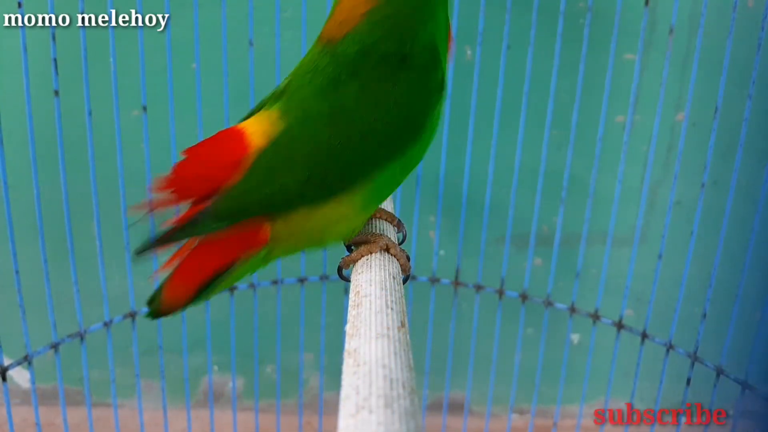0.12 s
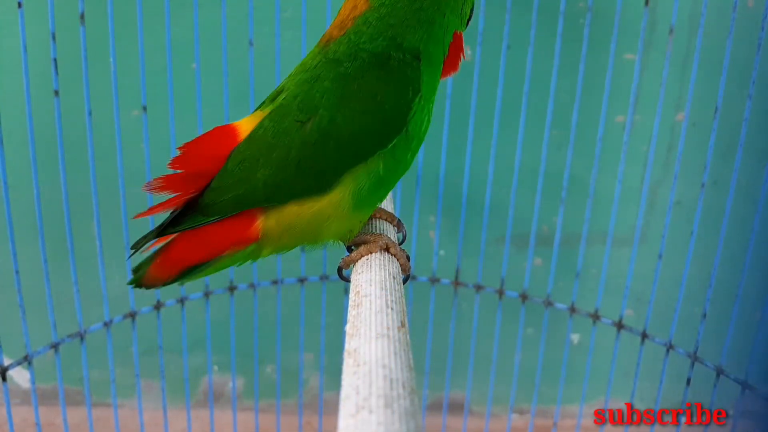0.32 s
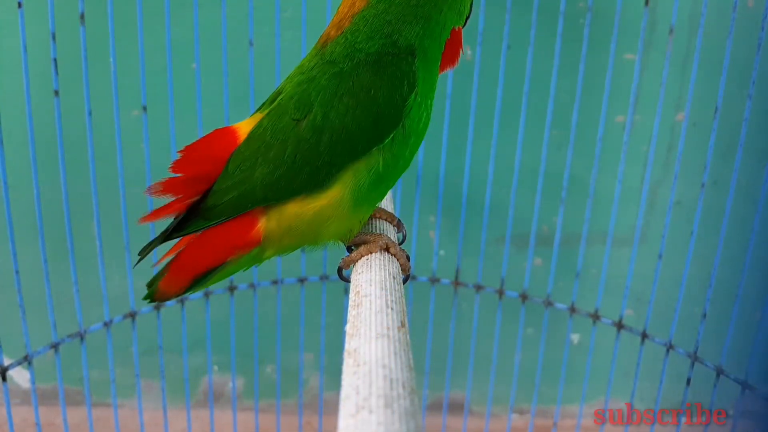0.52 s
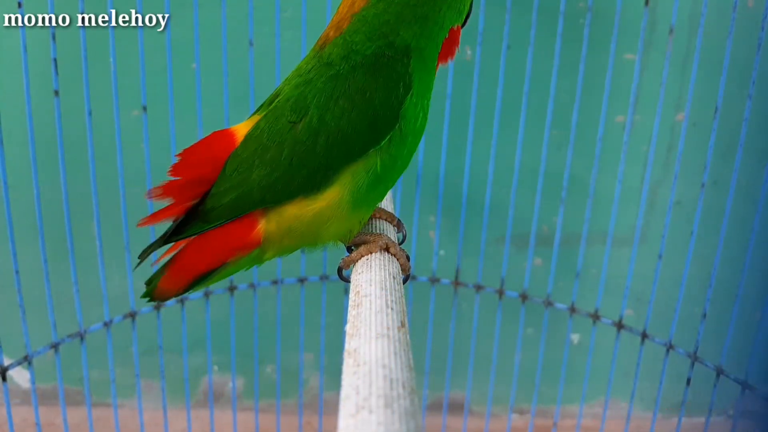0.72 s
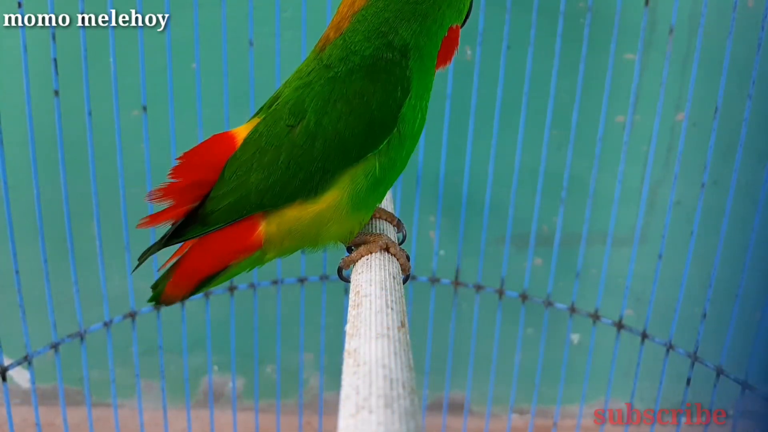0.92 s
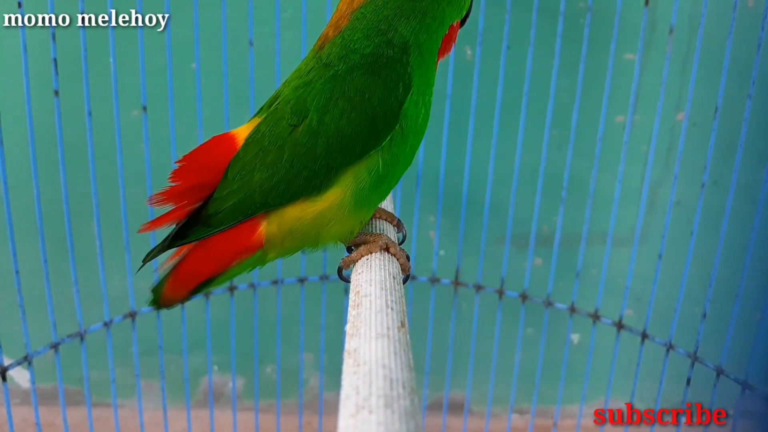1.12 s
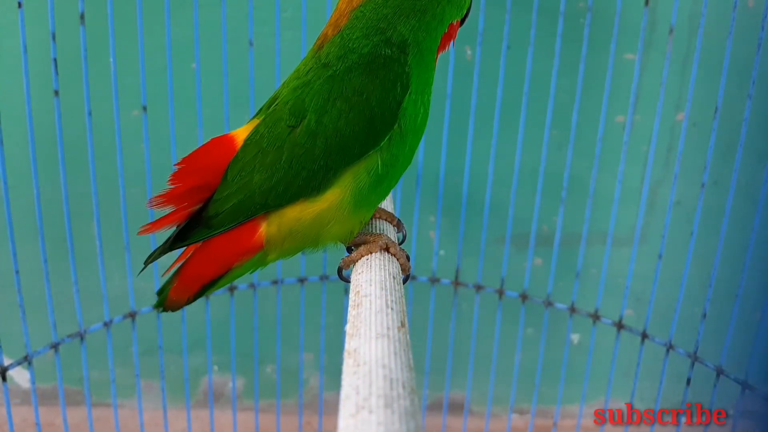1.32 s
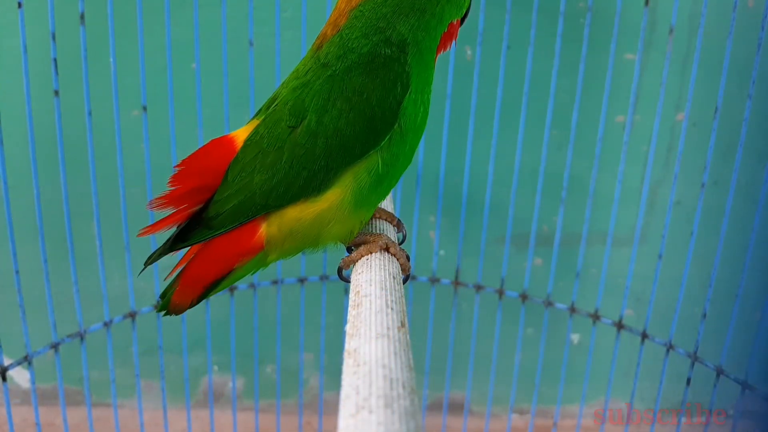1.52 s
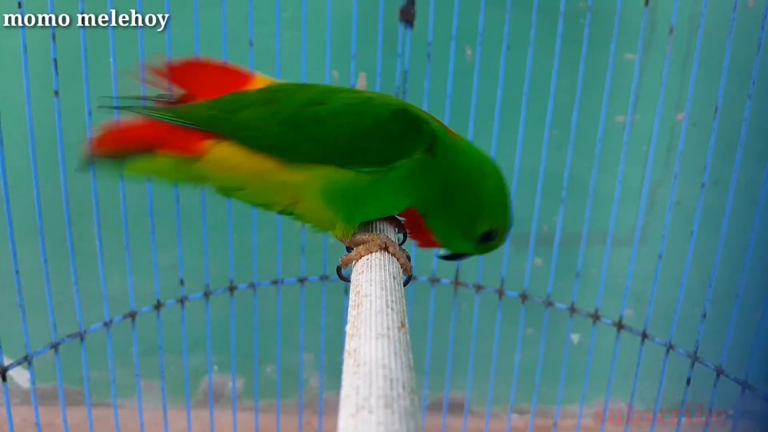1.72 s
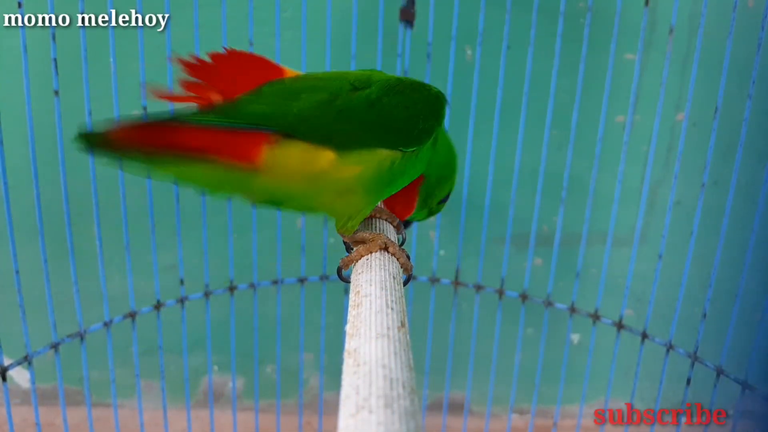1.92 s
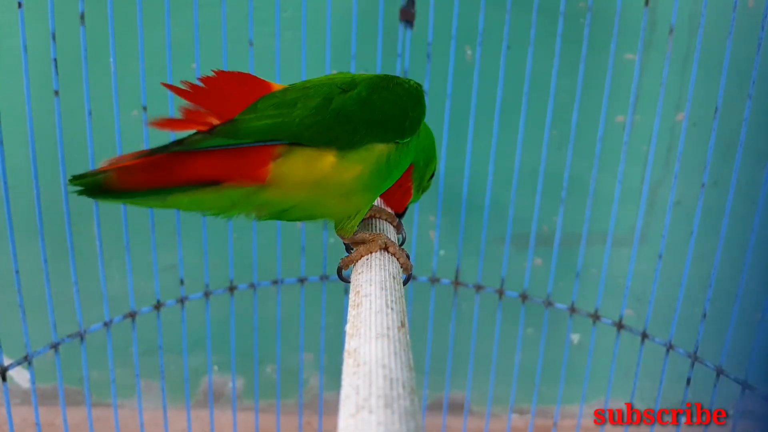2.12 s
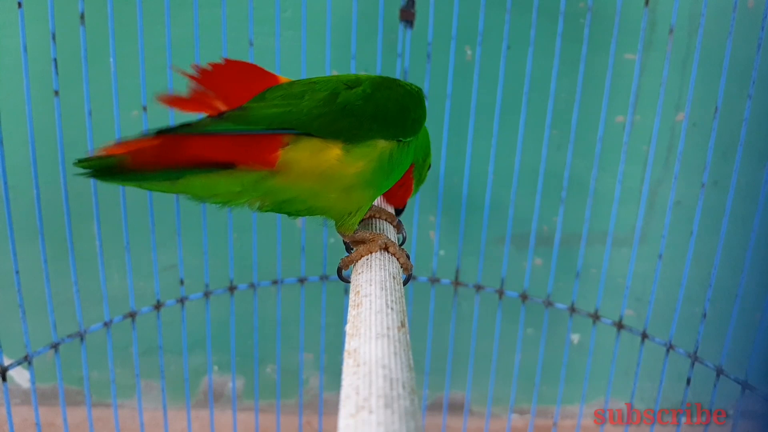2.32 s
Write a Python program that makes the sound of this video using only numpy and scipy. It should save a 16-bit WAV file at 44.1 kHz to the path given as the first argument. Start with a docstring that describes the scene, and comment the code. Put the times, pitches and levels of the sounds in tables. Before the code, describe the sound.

A small parrot calls close by in a hard, live room. A piercing, wavering whistle around 7 kHz starts at 0.2 s, with dull low puffs; quick warbles at 0.6 and 0.8 s end in squeaks. A much quieter chirp comes at 1.2 s, a faint raspy one at 1.7. Feathers rustle from 1.9 s with dry claw ticks, and thin rising peeps sound at 2.1 and 2.3 s over faint room rumble.

```python
"""Small parrot chirping in a cage

Close by in a hard-walled room it gives a long shrill whistle, two like warbles that end in squeaks,
a short chirp, a soft one and thin rising peeps: wobbling sine tones with overtones, air and rasp.
Dull puffs of low noise come with the loud notes. It swings round on its perch with a rustle of
feathers (grainy noise) and a few claw ticks (very short noise bursts), over a low room rumble.
"""
import sys
import numpy as np
from scipy import signal
from scipy.fft import rfft, irfft
from scipy.io import wavfile
from scipy.ndimage import uniform_filter1d, minimum_filter1d

SR = 44100
rng = np.random.default_rng(int(sys.argv[2]) if len(sys.argv) > 2 else 0)


def output_pcm(signal):
    """Save a mono or channel-first signal as 16-bit PCM at the path in sys.argv[1].

    Samples are clipped to [-1, 1] before scaling.
    """
    pcm = np.clip(np.atleast_2d(signal).T, -1, 1) * 32767
    wavfile.write(sys.argv[1], SR, np.round(pcm).astype(np.int16))


N = 110250
TIME = np.arange(N) / SR

# How the bird's voice organ moves in each kind of call, before the call list stretches, transposes
# and levels it: (time from the start of the call [s], pitch [Hz], level [dB], roughness [0-1])
WHISTLE = [(0, 7200, -28, .1), (.005, 7040, -17, .05), (.013, 6980, -11, .1), (.017, 5750, -18, .5),
           (.028, 7700, -21, 1), (.036, 7270, -11, .8), (.084, 7205, -7.5, .35), (.1, 7210, -12, .9),
           (.158, 7170, -8, .5), (.164, 6900, -17, .7), (.172, 5750, -21, .9), (.181, 4900, -20, .6),
           (.191, 6850, -19, .5), (.21, 7150, -13, .25), (.235, 7010, -6, .15), (.249, 7080, -10, .2),
           (.255, 7200, -28, .6)]
# the same columns, for a warble
WARBLE = [(0, 2900, -35, .6), (.006, 3160, -41, 1), (.014, 5750, -33, .7), (.029, 6370, -27, .6),
          (.052, 6750, -18.5, .17), (.064, 7170, -14.5, .12), (.071, 7230, -13, .12),
          (.082, 6950, -12.5, .1), (.093, 6280, -24, .43), (.104, 5300, -43, 1), (.111, 4750, -32, .8),
          (.115, 5200, -40, 1), (.123, 6450, -26, .8), (.131, 5900, -24, .5), (.138, 5000, -24, .4),
          (.143, 6200, -28, .5), (.147, 6480, -15, .15), (.152, 6800, -15, .15), (.156, 5500, -21, .3),
          (.159, 6700, -20, .3)]
# the same columns, for the high squeak that ends a warble
SQUEAK = [(0, 7600, -20, .3), (.003, 7950, -10, .1), (.008, 8010, -12, .15), (.014, 7930, -23, .4)]
# the same columns, for a short chirp
CHIRP = [(0, 6780, -64, 0.98), (.003, 6266, -39.5, 0.1), (0.011, 6584, -22.5, 0.056),
         (0.023, 6810, -36, 0.38), (0.037, 7200, -34.5, 1), (0.051, 6600, -41, .8), (.059, 4760, -46, 0.53),
         (0.073, 4200, -49, 1)]
# the same columns, for a soft chirp
SOFT_CHIRP = [(0, 2710, -60, 0.64), (0.025, 3966, -49.5, 0.85), (0.04, 6730, -36.5, 0.68),
              (.081, 6000, -48, 0.86), (0.104, 5450, -59.5, 0.96)]
# the same columns, for a thin rising peep
PEEP = [(0, 6420, -46, .45), (.028, 6350, -38, .4), (.062, 6630, -35, .5), (.115, 6810, -37, .25),
        (.14, 6850, -35, .1), (.158, 6860, -44, .2)]
# the same columns, for the last peep
LATE_PEEP = [(0, 6480, -38, .6), (.04, 6370, -37, .3), (.056, 6420, -27, .05), (.083, 6630, -32, .3),
             (.104, 6770, -38, .55), (.126, 6820, -32, .15), (.14, 6830, -46, .2), (.175, 6820, -40, .1)]


def from_db(db):
    """Turn decibels into a gain: every 20 dB is a factor of ten."""
    return 10 ** (np.asarray(db) / 20)


def rms_one(x):
    """Scale a sound so that its average strength (rms) is 1."""
    return x / np.sqrt(np.mean(x ** 2) + 1e-20)


def in_time(points):
    """Draw a curve through (time, value) points and read it at every sample."""
    times, values = np.transpose(points)
    return np.interp(TIME, times, values)


def at_hz(points, hz):
    """Gain of a (frequency, dB) spectrum at the given frequencies."""
    point_hz, point_db = np.transpose(points)
    return from_db(np.interp(np.log(hz + 1), np.log(point_hz), point_db))


def pan(db):
    """Left and right gains that differ by db (plus is left) but keep the total power."""
    gains = from_db(np.array([[.5], [-.5]]) * db)
    return gains / np.sqrt(np.mean(gains ** 2, axis=0))


def drift(top_hz):
    """A random wander with rms 1 that holds little movement faster than top_hz."""
    lowpass = signal.butter(3, top_hz, fs=SR, output="sos")
    return rms_one(signal.sosfilt(lowpass, rng.standard_normal(N)))


def noise(spectrum):
    """Coloured stereo noise of rms 1, partly alike on both sides."""
    likeness = .27  # 0 is unrelated sides, 1 is the same on both
    white = rfft(rng.standard_normal((2, N)))
    mid, side = irfft(white * at_hz(spectrum, np.fft.rfftfreq(N, 1 / SR)), N)
    return rms_one(np.sqrt(1 + likeness) * mid + np.sqrt(1 - likeness) * side * [[1], [-1]])


def background():
    """Low room rumble as shaped noise, and a thin band of hiss as noise through a resonance."""
    # rumble and faint hiss: (frequency [Hz], level [dB])
    floor = [(20, -45.5), (45, -18.5), (70, -9), (120, -6.5), (230, -18.5), (400, -33.5), (500, -35.5),
             (590, -24.5), (670, -43.5), (1000, -43.5), (3000, -55.5), (4200, -52), (5000, -41),
             (5700, -60.5), (7000, -49), (8500, -60), (11000, -51.5), (16000, -65.5)]
    # overall level of that noise: (time [s], level [dB])
    floor_level = [(0, -56), (1.1, -60), (1.65, -61.5), (2.0, -53.5), (2.5, -48.5)]
    hiss_hz, hiss_width_hz, hiss_db = 6940, 700, -70
    radius = np.exp(-np.pi * hiss_width_hz / SR)
    angle = 2 * np.pi * hiss_hz / SR
    resonance = [1, 0, -1, 1, -2 * radius * np.cos(angle), radius * radius]
    # the resonance is applied twice for steeper sides
    hiss = rms_one(signal.sosfilt([resonance, resonance], rng.standard_normal((2, N))))
    rumble = from_db(in_time(floor_level)) * noise(floor) * pan(4.5)
    return rumble + from_db(hiss_db) * hiss


def parrot():
    """A near sine and its weak overtones; roughness shakes pitch and level and adds air and rasp."""
    # calls: (start [s], level [dB], overtones [dB], rasp [dB], length [ratio], pitch [ratio], gesture)
    call_list = [(0.209, -1, -4, -35, 1, 1, WHISTLE), (0.58, 0, -4, -11.5, 0.99, 1, WARBLE),
                 (0.7399, 1.5, -4, -26, 1, 0.99, SQUEAK), (.833, -3, -8, -12, 0.99, .99, WARBLE),
                 (0.992, -5.5, 3, -25, 1.13, 0.99, SQUEAK), (1.212, 4, -6, -14.5, 0.96, 0.98, CHIRP),
                 (1.72, -6.5, -18, -5, 1, 1, SOFT_CHIRP), (2.12, 0.5, -26, -37, 1.073, 1, PEEP),
                 (2.327, 0, -26, -33, 0.9, 1, LATE_PEEP)]
    # second, third and fourth harmonic against the note, before throat and call: (level [dB])
    overtone_levels = [-12, -41.5, -37.5]
    # how throat and beak pass the overtones: (frequency [Hz], level [dB])
    throat = [(5500, 21), (7000, 23.5), (8200, 28), (9500, -5), (11000, 9), (13000, -7.5), (14500, -4.5),
              (15900, -14.5)]
    # air noise round a rough note: (frequency [Hz], level [dB])
    air_spectrum = [(4700, -22), (5600, -13), (7000, -1.5), (8100, 37.5), (9200, -50.5), (12000, -29),
                    (15000, -7.5), (16500, -31)]
    # the wide rasp of the harsher calls: (frequency [Hz], level [dB])
    rasp_spectrum = [(600, -14.5), (1500, -18.5), (2100, -7), (2550, -9.5), (3000, 1), (4300, -10),
                     (6500, 4.5), (8000, 4.5), (9300, -13.5), (11500, -2), (15500, -11.5)]
    edge_s = .0034  # fade at each end of a call
    wobble_hz = 397  # fastest random wobble
    jitter_share, shimmer_db = .009, 1.36  # pitch and level wobble of a fully rough note
    # below its clear register the note breaks up: extra wobble and rasp
    clear_hz, break_span_hz = 6660, 1950
    break_jitter_share, break_shimmer_db, break_rasp_db = .022, 4, 12.5
    flutter_hz, flutter_depth, flutter_wander = 548.5, .2, .12  # fast throb of a rough note
    air_db = -23.5  # at full roughness, against the tone
    subharmonic_db = -45  # a faint, hoarse band an octave below the note

    jitter, shimmer = drift(wobble_hz), drift(wobble_hz)
    air, rasp = noise(air_spectrum)[0], noise(rasp_spectrum)[0]
    flutter_rate = flutter_hz * (1 + flutter_wander * drift(32))
    flutter = np.sin(2 * np.pi * np.cumsum(flutter_rate) / SR)
    note, overtones = np.zeros((2, N))
    for start, level_db, overtones_db, rasp_db, length, pitch, gesture in call_list:
        times, *controls = np.transpose(gesture)
        times = start + times * length
        gate = np.clip(np.minimum(TIME - times[0], times[-1] - TIME) / edge_s + .5, 0, 1)
        on = gate > 0
        hz, db, rough = [np.interp(TIME[on], times, control) for control in controls]
        hz = hz * pitch
        low = np.clip((clear_hz - hz) / break_span_hz, 0, 1)  # 0 clear, 1 fully broken

        wobble = (jitter_share + break_jitter_share * low) * rough * jitter[on]
        phase = 2 * np.pi * np.cumsum(hz * (1 + wobble)) / SR
        level = gate[on] * from_db(db + level_db)
        throb = 1 + flutter_depth * rough * flutter[on]
        shake = from_db((shimmer_db + break_shimmer_db * low) * rough * shimmer[on])
        tone = np.sqrt(2) * level * throb * shake

        hoarse = from_db(subharmonic_db) * shimmer[on] * np.sin(phase / 2)
        rasp_gain = from_db(rasp_db + break_rasp_db * low)
        breath = rough * (from_db(air_db) * air[on] + rasp_gain * rasp[on])
        note[on] += tone * (np.sin(phase) + hoarse) + level * breath
        for multiple, partial_db in enumerate(overtone_levels, 2):
            partial_hz = multiple * hz
            gain = from_db(partial_db + overtones_db) * at_hz(throat, partial_hz)
            gain = gain * (partial_hz < SR / 2)  # nothing above what the sample rate can hold
            overtones[on] += tone * gain * np.sin(multiple * phase)
    flicker = rms_one(from_db(3 * drift(wobble_hz)))  # the overtones are unsteady
    return note, overtones * flicker


def delayed(x, seconds):
    """The same sound a little later."""
    return np.interp(TIME - seconds, TIME, x, left=0)


def near(x):
    """Direct sound with a few near reflections, which reach each side at different times."""
    # near reflections: (left delay [s], right delay [s], level [dB])
    echoes = [(.0031, 0.0051, -12.5), (.0083, 0.0086, -20.5), (0.0109, .0141, -13)]
    out = np.array([x, x])
    for left_s, right_s, db in echoes:
        # delays are cut to whole samples
        echo = np.array([delayed(x, int(s * SR) / SR) for s in (left_s, right_s)])
        out = out + from_db(db) * echo
    return out


def room(x):
    """Many mixed echoes as a fading noise tail, different at each side and shorter in the top treble."""
    # time the tail takes to fade by 60 dB: (frequency [Hz], fade time [s])
    fade_times = [(4000, .38), (7000, .32), (8000, .26), (14500, .21)]
    room_db, onset_s = -8, .0088
    t = TIME[:SR * 3 // 4]
    white = rfft(rng.standard_normal((2, len(t))))
    hz = np.fft.rfftfreq(len(t), 1 / SR)
    centres, t60s = np.transpose(fade_times)
    tail = 0
    # overlapping bands, each with its own fade
    for band, t60 in zip(np.eye(len(centres)), t60s):
        band_noise = irfft(white * np.interp(hz, centres, band), len(t))
        tail = tail + band_noise * from_db(-60 * t / t60)
    response = from_db(room_db) * rms_one(tail * (t > onset_s)) / np.sqrt(len(t))
    return signal.fftconvolve(np.atleast_2d(x), response, axes=1)[:, :N]


def puffs():
    """Short swells of low noise that die away, some duller than others."""
    # dull puffs with the loud notes: (time [s], half length [s], level [dB], top edge [Hz])
    puff_list = [(0.263, 0.034, -38.5, 854), (0.337, 0.027, -32, 784), (0.415, 0.035, -45.5, 2490),
                 (0.445, 0.018, -37, 603), (0.657, 0.013, -44.5, 590), (0.745, 0.0026, -32, 1630),
                 (0.91, 0.011, -47.5, 544), (0.996, 0.0042, -40, 920)]
    # colour before the top edge is cut: (frequency [Hz], level [dB])
    puff_spectrum = [(25, -35), (60, 2.5), (150, -0.5), (300, -5), (550, -10.5), (800, -18), (1400, -15.5),
                     (2500, -21.5), (5000, -62.5)]
    decay_s = .0061
    source, out = noise(puff_spectrum), 0
    for middle, half_length, db, edge_hz in puff_list:
        lowpass = signal.butter(4, edge_hz, fs=SR, output="sos")
        dulled = signal.sosfilt(lowpass, source)
        swell = np.exp(-np.maximum(abs(TIME - middle) - half_length, 0) / decay_s)
        out = out + dulled * from_db(db) * swell
    return out * pan(-12.5)


def feathers():
    """Feathers rub as the bird turns: noise whose level jumps in uneven clumps of grains."""
    # course of the rustle: (time [s], level [dB])
    rustle_level = [(1.66, -98.5), (1.72, -67.5), (1.89, -68.5), (1.92, -55.5), (1.96, -55.5), (2.06, -59),
                    (2.25, -56), (2.36, -63.5), (2.5, -66.5)]
    # colour of the rustle: (frequency [Hz], level [dB])
    rustle_spectrum = [(200, -0.5), (500, -3.5), (800, -11), (3000, -14.5), (4500, -14.5), (7400, -6.5),
                       (9000, -27), (11000, -21), (15500, -26)]
    grain_db, clump_db = 2.2, 2.2
    grain = from_db(grain_db * drift(200) + clump_db * drift(20))
    return from_db(in_time(rustle_level)) * rms_one(noise(rustle_spectrum) * grain)


def claws():
    """Dry noise ticks that die within milliseconds and leave the perch ringing faintly."""
    # claw ticks on the perch, relative to each other: (time [s], level [dB])
    ticks = [(1.912, -55), (1.92, -47.5), (1.947, -46), (1.9867, -38), (2.021, -56.5), (2.102, -51),
             (2.238, -63)]
    # colour of a tick: (frequency [Hz], level [dB])
    tick_spectrum = [(300, -11), (1100, -6), (2000, -1), (4000, 8), (7000, 5.5), (11000, 1), (15500, -7)]
    decay_s = .0025
    perch_hz, perch_t60_s, perch_db = 1130, .18, -24.5  # t60: time to fade by 60 dB
    bursts, ring = 0, 0
    for start, db in ticks:
        started = TIME >= start
        since = abs(TIME - start)
        bursts = bursts + from_db(db) * started * np.exp(-since / decay_s)
        ring_gain = from_db(db + perch_db - 60 * since / perch_t60_s)
        ring = ring + ring_gain * started * np.sin(2 * np.pi * perch_hz * since)
    return bursts * noise(tick_spectrum)[0] / 2 + ring


def scene():
    """The bird in its room: each sound is placed, given its share of echo and added up."""
    # left-right balance of the voice, plus is left: (time [s], level [dB])
    voice_pan = [(.215, -6), (.25, 6.5), (.36, 1), (.40, -4), (.445, -0.5), (.49, -2.5), (1.0, -2.5),
                 (1.22, 3.5), (2.4, -5)]
    voice_db, overtone_pan_db = -3, -8
    overtone_room_db, puff_room_db, tick_db = 3.5, -8, 3
    right_lag_s = .000025
    floor = background()
    note, overtones = parrot()
    left, right = near(note) * pan(in_time(voice_pan))
    voice = np.array([left, delayed(right, right_lag_s)])
    voice = voice + near(overtones) * pan(overtone_pan_db)
    # the overtones reach the listener more by way of the walls
    voice = voice + room(note + from_db(overtone_room_db) * overtones)
    puff = puffs()
    puff = puff + from_db(puff_room_db) * room(puff)
    rustle = feathers()
    tick = claws()
    tick = from_db(tick_db) * (near(tick) + room(tick))
    return floor + from_db(voice_db) * voice + puff + rustle + tick


def record(dry):
    """A limiter turns the loudest peaks down smoothly, then the top treble is cut."""
    ceiling, limiter_s, cutoff_hz = .85, .004, 15900
    size = int(limiter_s * SR)
    needed = ceiling / np.maximum(abs(dry).max(axis=0), ceiling)
    gain = uniform_filter1d(minimum_filter1d(needed, size), size)
    lowpass = signal.ellip(10, .2, 80, cutoff_hz, fs=SR, output="sos")
    return signal.sosfilt(lowpass, gain * dry)


dry = scene()
out = record(dry)
output_pcm(out)
```